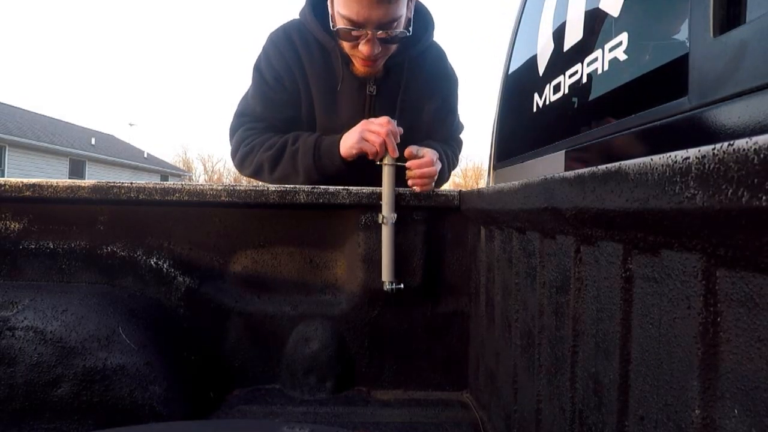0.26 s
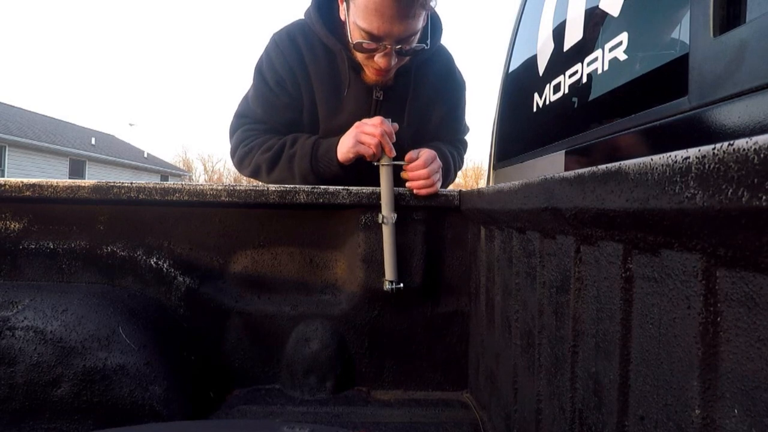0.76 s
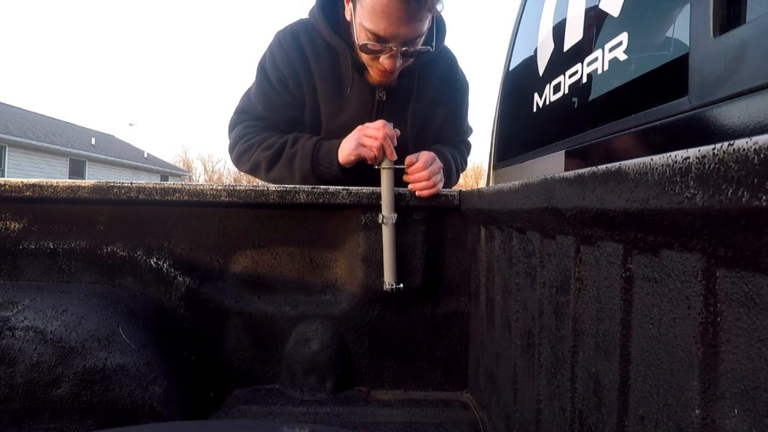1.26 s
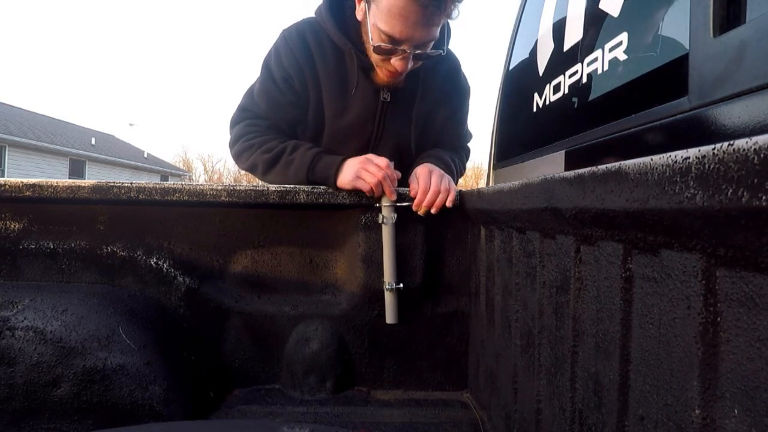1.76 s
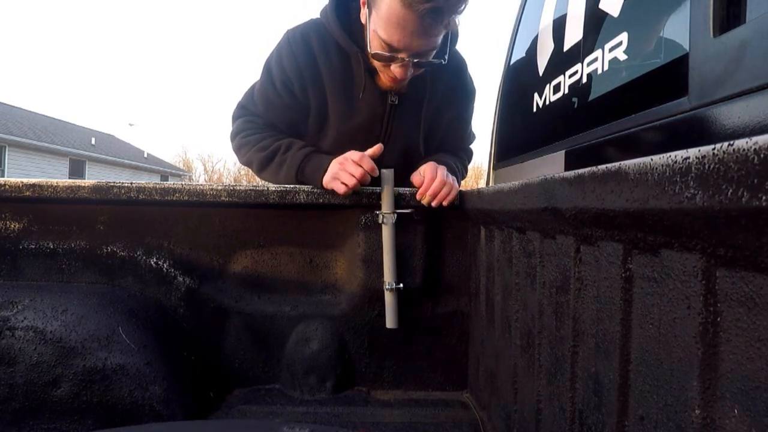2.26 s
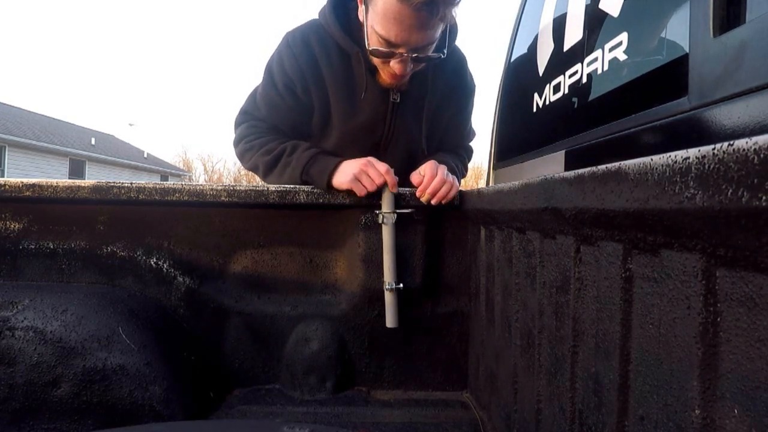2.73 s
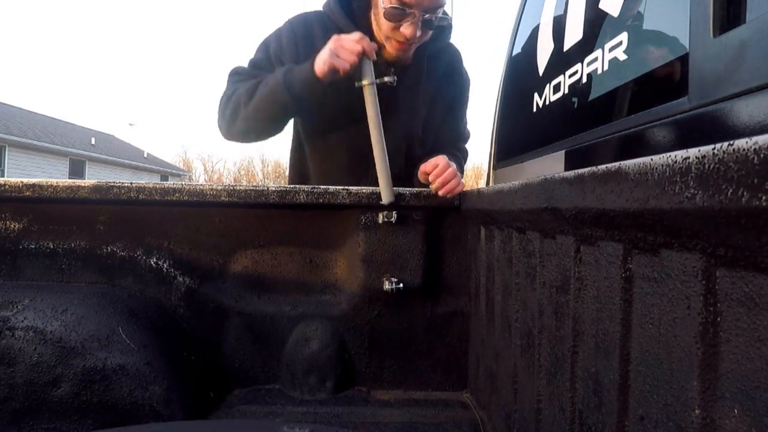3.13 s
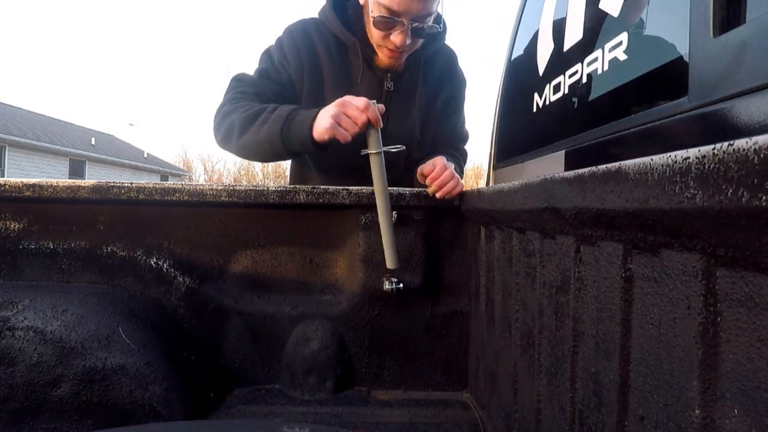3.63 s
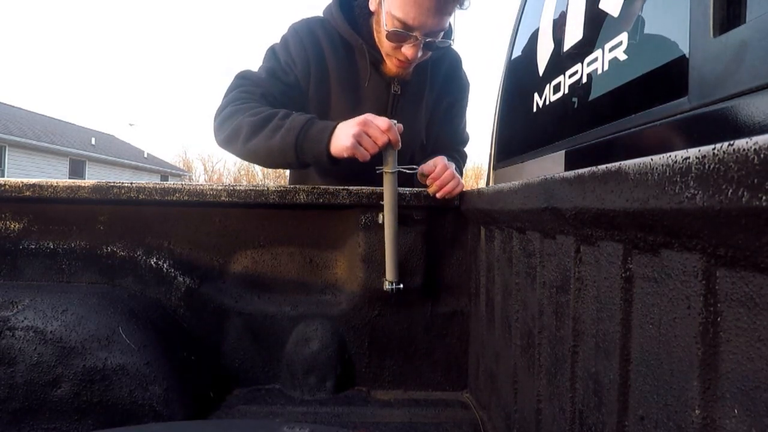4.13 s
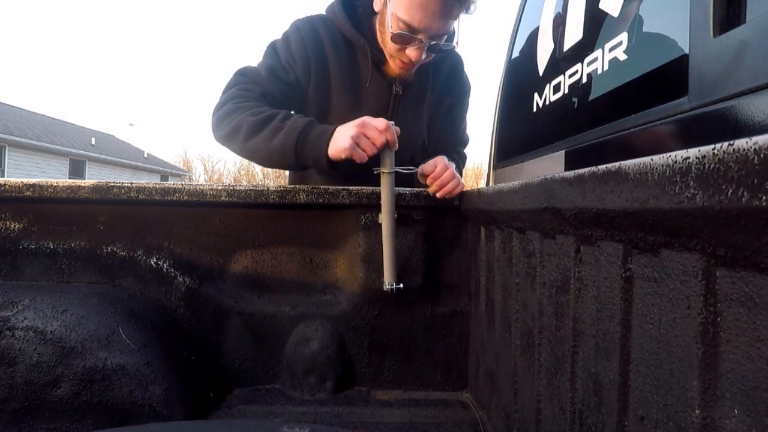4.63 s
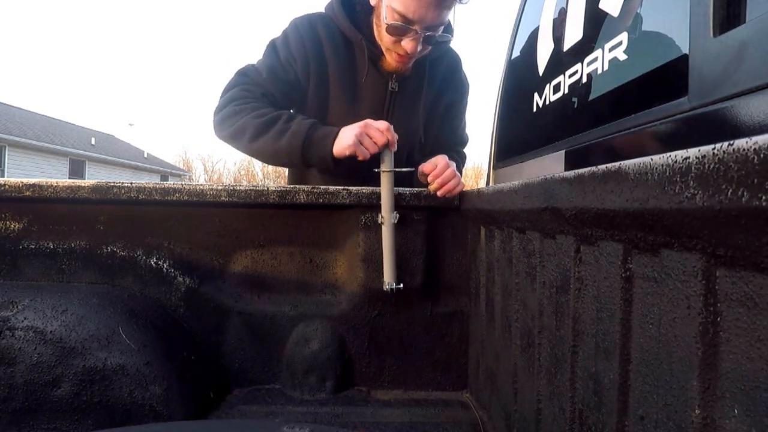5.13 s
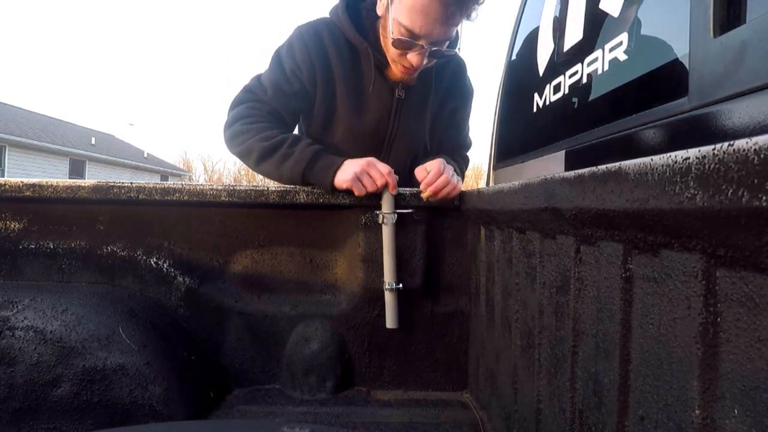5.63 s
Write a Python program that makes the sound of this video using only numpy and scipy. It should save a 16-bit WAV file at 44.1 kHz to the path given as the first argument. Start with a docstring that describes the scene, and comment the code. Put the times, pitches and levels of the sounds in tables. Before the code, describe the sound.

Outdoors beside a pickup bed, close to the microphone, with low wind buffets that mostly calm later and a very faint distant hum. A plastic pipe rubs briefly, then strikes a metal clamp with a hard, bright double clack at 0.3 s. Faint ticks and short dry scrapes follow, with more rubbing from 1.5 s until a sharp, higher clack at 1.9 s. Near quiet holds until about 2.7 s. Then the pipe is pulled out: the strongest scrape, a short rising groan and a cluster of knocks, ending around 3.05 s in a faint hollow ring. Quiet again until light clicks at 3.85 s. From 4.2 s come irregular ticks and scrapes as it is worked back in. A brief squeaky groan leads to heavy hollow knocks at 5.25 s, then smaller knocks, scraping and a last bright clack at 5.7 s. The bed adds a brief rattle.

```python
"""Outdoors, at the bed of a pickup: a plastic pipe is pushed down through bent metal clamps on the bed's wall,
pulled out and pushed in again. It ticks against the clamps, scrapes through them and knocks home.
Blows and rubbing are short noises and clicks that set off the ring of pipe, clamps and wall, with a brief rattle
between the sides of the bed. Gliding tones make the groans, fading tones the ring of the freed pipe,
and filtered noise the wind on the microphone and a distant hum."""
import sys
import numpy as np
from scipy import signal
from scipy.fft import rfft, irfft, next_fast_len
from scipy.io import wavfile

SR = 44100
rng = np.random.default_rng(int(sys.argv[2]) if len(sys.argv) > 2 else 0)


def wav_out(sig):
    """Save sig, one row per channel (or a flat mono array), as 16-bit PCM at SR to the path in sys.argv[1]."""
    wavfile.write(sys.argv[1], SR, np.round(np.clip(np.atleast_2d(sig).T, -1, 1) * 32767).astype(np.int16))


N = 259308  # samples in the scene
RING = 32768  # samples in one ring
TIME = np.arange(N) / SR  # s
# a blow favours one of four notes of the pipe, by where it lands; the clamp strap answers near its own note
LOW_HZ, MID_HZ, SEATED_HZ, HIGH_HZ, STRAP_HZ = 777.5, 926, 1020, 1525, 2168

# edges of the boom, thump, knock, clack and tick ranges: low [Hz], high [Hz]
RANGES_HZ = [(90, 260), (260, 700), (700, 2000), (2000, 6000), (6000, 15000)]


def undb(db):
    """Turn decibels into gain."""
    return 10 ** (np.asarray(db) / 20)


def unit(x):
    """Scale to an average (rms) strength of 1."""
    return x / np.sqrt(np.mean(x ** 2))


def along(points, size):
    """Read (Hz, value) points at every bin of a spectrum, on a log-frequency axis."""
    hz, value = np.transpose(points)
    bin_hz = np.arange(size // 2 + 1) * SR / size
    return np.interp(np.log(np.maximum(bin_hz, 1)), np.log(hz), value)


def tint(x, *curves):
    """Colour a sound with curves of (Hz, dB) points, which add up; nothing sounds ahead of its cause."""
    size = next_fast_len(len(x) // 2 + 1024) * 2
    total_db = sum(along(points, size) for points in curves)
    # folding the cepstrum makes the filter minimum-phase, so it acts only forward in time
    cepstrum = irfft(np.log(undb(total_db)), size)
    cepstrum[1:size // 2] *= 2
    cepstrum[size // 2 + 1:] = 0
    return irfft(rfft(x, size) * np.exp(rfft(cepstrum)), size)[:len(x)]


def outdoors():
    """Wind is very low noise in slow buffets; the distant hum is noise whose level wavers."""
    # strength of the wind, gusty at first and then calm: start_s [s], level_db [dB, ahead of the gain below]
    gusts = [(0.0, -38), (0.05, -35.5), (0.65, -46.5), (0.74, -47.5), (1.28, -29.5), (1.31, -41.5),
             (1.41, -33), (1.77, -35.5), (1.85, -38.5), (2.15, -39), (2.21, -54.5), (2.6, -38),
             (3.19, -54.5), (5.21, -60), (5.31, -42), (5.88, -57)]
    # colour of the wind: pitch_hz [Hz], level_db [dB]
    wind_colour = [(2, -3.5), (8, 20.5), (20, -4), (35, -3.5), (60, -23), (120, -38.5), (300, -90.5)]
    # colour of the distant outdoor hum: pitch_hz [Hz], level_db [dB]
    hum_colour = [(24, -37.5), (40, -3.5), (75, 10), (101, -4), (139, 2), (162, -9), (317, -15.5),
                  (591, -20.5), (740, -24.5), (797, -25.5), (1130, -28.5), (1250, -30), (15500, -47)]
    wind_gain_db, hum_db, waver_db = 8, -59.3, 0.7

    wind_level_db = wind_gain_db + np.interp(TIME, *np.transpose(gusts))
    wind = unit(tint(rng.standard_normal(N), wind_colour)) * undb(wind_level_db)
    waver = np.interp(TIME, np.linspace(0, TIME[-1], 30), rng.standard_normal(30))
    hum = unit(tint(rng.standard_normal(N), hum_colour)) * undb(hum_db + waver_db * waver)
    return wind + hum


def fade(t60):
    """Die away evenly in dB over one ring, by 60 dB in t60 seconds."""
    return np.exp(-np.log(1000) * np.arange(RING) / SR / np.maximum(t60, 1e-4))


def tone(hz, t60):
    """One struck mode: a single pitch that dies away."""
    return np.sin(2 * np.pi * hz * np.arange(RING) / SR) * fade(t60)


def rattles(count):
    """Dense reflections between the sides of the bed are fading noise; the treble dies first."""
    # how long the reflections last: pitch_hz [Hz], t60_s [s to fall by 60 dB]
    bed_t60 = [(100, 1), (260, 0.6), (700, 0.28), (1840, 0.23), (4850, 0.14), (12800, 0.12)]
    spectra = rfft(rng.standard_normal((count, RING)))
    centres = np.geomspace(80, 14000, 9)  # Hz
    hz, t60 = np.transpose(bed_t60)
    out = 0
    for centre, share in zip(centres, np.eye(len(centres))):
        band = irfft(spectra * along(np.c_[centres, share], RING))
        out = out + band * fade(np.interp(np.log(centre), np.log(hz), t60))
    return out


def responses(count):
    """Answers to a touch at several places: a bright crack, ringing modes and partly alike reflections."""
    # ring of wall, pipe and clamps: pitch_hz [Hz], level_db [dB, before random scatter], t60_s [s]
    modes = [(122.4, -21.5, 0.66), (148, -24, 0.22), (180.3, -26.5, 0.63), (204.1, -18.5, 0.42),
             (282, -28, 0.65), (348.4, -27, 0.66), (385, -29, 0.66), (647.1, -23.5, 0.35),
             (788, -20.5, 0.11), (802, -27.5, .35), (942, -22.5, 0.35), (972, -30, 0.069),
             (1292, -17, 0.12), (1501, -27.5, 0.033), (1690, -31.5, 0.077), (1940, -32, 0.26),
             (2075, -24, 0.15), (2300, -14, 0.068), (3380, -17.5, 0.065), (5970, -19, 0.06),
             (7620, -15, .17), (7600, -10.5, 0.13), (10620, -21.5, 0.026), (11280, -2.5, 0.083)]
    crack_db, crack_t60_s, crack_hz = 9, 0.07, 6000
    rattle_db, scatter_db, build_s = -1, 3, 0.0017
    alike = 0.59  # share of the reflections' power that all places have in common

    common, *own = rattles(count + 1)
    bed = np.sqrt(alike) * common + np.sqrt(1 - alike) * np.array(own)

    rings = np.array([undb(db) * tone(hz, t60) for hz, db, t60 in modes])
    shape = (count, len(modes))
    weights = undb(scatter_db * rng.standard_normal(shape)) * rng.choice([-1, 1], shape)

    # the metal strap cracks at once; plastic and wall take a few milliseconds to get going
    highpass = signal.butter(2, crack_hz, "high", fs=SR, output="sos")
    crack = signal.sosfilt(highpass, rng.standard_normal((count, RING)) * fade(crack_t60_s))
    swell = 1 - np.exp(-np.arange(RING) / SR / build_s)
    return undb(crack_db) * crack + swell * (undb(rattle_db) * bed + weights @ rings)


def formants(scatter_db):
    """Broad resonances as (Hz, dB) points; each point of contact favours different ones."""
    # pipe wall and clamp straps: pitch_hz [Hz], width_hz [Hz], level_db [dB, before random scatter]
    resonances = [(920, 110, -1), (1590, 370, 6), (2370, 1000, 3.5), (3400, 910, 1.5), (4410, 630, 4),
                  (4960, 350, 2), (5803, 110, 11), (6300, 170, 1.5), (8300, 1100, 4), (8700, 220, 7),
                  (9400, 180, 14), (10445, 750, 14.5), (11490, 1300, 8.5), (12950, 2100, 4.5),
                  (14900, 1300, 8.5)]
    grid = np.arange(20, 17000, 40)  # Hz
    hz, width, db = np.transpose(resonances)
    bumps = 0.5 ** (2 * (grid[:, None] - hz) / width) ** 2
    return np.c_[grid, bumps @ (db + scatter_db * rng.standard_normal(len(db)))]


def slips(rate, size_db):
    """Sticking and slipping gives clicks at random moments, many small and a few large."""
    size = undb(size_db * np.minimum(rng.exponential(size=N), 4))
    clicks = rng.random(N) < rate / SR  # rate is clicks per second
    return unit(clicks * size * rng.choice([-1, 1], N))


def moving_contact(push, count):
    """The contact jumps from place to place along the pipe; each rings in its own way, damped by the grip."""
    dwell_s, grip_t60_s = 0.045, 1.0
    place = (TIME / dwell_s).astype(int) % count
    out = np.zeros(N)
    for k, ring in enumerate(responses(count)):
        ring = tint(ring * fade(grip_t60_s), formants(scatter_db=4.5))
        out += signal.oaconvolve(push * (place == k), ring / np.linalg.norm(ring))[:N]
    return out


def scrapes():
    """The pipe speeds up, slides in tiny slips and brakes; the clamp's edge adds hiss as the speed grows."""
    # slides: start_s [s], speeding_up_s [s], full_speed_s [s],
    # rub_db and hiss_db [dB at full speed, ahead of filters and grip]
    slides = [(0.0, 0.05, .05, -49.5, -86), (0.11, 0.092, 0.089, -37, -71), (0.70, 0.023, 0.034, -42, -75),
              (1.06, 0.034, 0.046, -43.5, -66.5), (1.21, .04, 0.019, -50.5, -93),
              (1.349, 0.054, 0.05, -46, -88.5), (1.519, 0.06, 0.022, -39.5, -67),
              (1.60, 0.033, 0.028, -38.5, -66), (1.722, 0.12, 0.042, -37, -61),
              (2.81, 0.086, 0.045, -30.5, -64), (2.928, 0.14, 0.032, -26.5, -55.5),
              (4.18, 0.077, 0.087, -34.5, -60), (4.55, 0.024, 0.047, -42.5, -83),
              (4.64, 0.11, 0.025, -55, -97), (5.08, .14, 0.013, -37.5, -68),
              (5.422, 0.086, 0.0044, -33, -67), (5.59, 0.037, 0.046, -38.5, -64.5),
              (5.759, 0.06, 0.092, -55, -85)]
    # colour of the sliding: pitch_hz [Hz], level_db [dB]
    rub_colour = [(40, -11.5), (120, -7.5), (200, 8), (400, 11), (900, 13), (2000, -2), (2400, 1),
                  (3500, -4), (5500, -11), (6700, -12), (8300, -2.5), (11300, -7), (12500, -4),
                  (14500, -10)]
    braking_share = 0.45  # braking time over speeding-up time
    rub_power, hiss_power = 1.01, 1.6  # how steeply each grows with speed
    grip_db, grip_rate_hz, split_hz = 2, 45, 5200

    rub, hiss = np.zeros((2, N))
    for start, rise, hold, rub_db, hiss_db in slides:
        corners = start + np.cumsum([0, rise, hold, braking_share * rise])
        speed = np.interp(TIME, corners, [0, 1, 1, 0])
        rub += undb(rub_db) * speed ** rub_power
        hiss += undb(hiss_db) * speed ** hiss_power

    uneven = np.interp(TIME * grip_rate_hz, np.arange(N), rng.standard_normal(N))
    grip = undb(grip_db * uneven)
    lowpass = signal.butter(4, split_hz, fs=SR, output="sos")
    highpass = signal.butter(4, split_hz, "high", fs=SR, output="sos")
    dull = signal.sosfilt(lowpass, slips(rate=520, size_db=3.0) * rub)
    sharp = signal.sosfilt(highpass, slips(rate=8700, size_db=6.0) * hiss)
    return tint(moving_contact((dull + sharp) * grip, count=11), rub_colour)


def chatter(ring, looseness, count):
    """A loose pipe rebounds a few times; one driven hard against the clamp is damped by it."""
    gap_s, bounce_db, seated_t60_s = 0.006, -4, 0.23
    out = ring.copy()
    lags = (np.cumsum(rng.uniform(0.5, 2, count)) * gap_s * SR).astype(int)
    for k, lag in enumerate(lags):
        bounce = looseness * undb(bounce_db * (k + 2.5)) * rng.choice([-1, 1])
        out[lag:] += bounce * ring[:RING - lag]
    held = (1 - looseness) * fade(seated_t60_s) + looseness
    return out * held * np.linalg.norm(ring) / np.linalg.norm(out)


def blow(ring, force_db, note, high_note):
    """One contact: it rebounds most if light, and favours two notes and the modes next to them."""
    note_db, note_t60_s = -14, 0.059
    high_note_db, high_note_t60_s = -16, 0.11
    lift_db, lift_octaves = 4, 0.04
    loose_db, seated_db = -42, -25  # forces between which the rebounds weaken

    looseness = np.interp(force_db, [loose_db, seated_db], [1, 0.35])
    low_tone = undb(note_db) * tone(note, note_t60_s)
    high_tone = undb(high_note_db) * tone(high_note, high_note_t60_s)
    step = 2 ** lift_octaves
    lifts = [[(hz / step, 0), (hz, lift_db), (hz * step, 0)] for hz in (note, high_note)]
    struck = chatter(ring, looseness, count=3) + low_tone + high_tone
    return tint(struck, formants(scatter_db=3.5), *lifts)


def range_db(x):
    """Energy of a ring in each of the five ranges, in dB."""
    power = np.abs(rfft(x)) ** 2
    hz = np.arange(RING // 2 + 1) * SR / RING
    return np.array([10 * np.log10(power[(hz >= low) & (hz < high)].sum()) for low, high in RANGES_HZ])


def balance(force, hardness, weight, note_hz):
    """Strength of the five ranges in dB: weight shakes the wall, hardness makes the clamp tick."""
    # higher notes ring more in the pipe, less in the strap: 3 dB an octave
    pipe_db = 3 * np.log2(note_hz / MID_HZ)
    boom = -3 + 0.75 * weight
    thump = -2.54 + 1.0 * weight + 0.32 * hardness
    knock = 0.35 + pipe_db
    clack = 0.5 - pipe_db + 0.18 * hardness
    tick = -13 + hardness
    return force + np.array([boom, thump, knock, clack, tick])


def wall(x):
    """The heavy wall takes some milliseconds to answer, so its boom near 185 Hz comes late."""
    # taking away twice the peak makes an all-pass: a delay around that pitch, no change of level
    return x - 2 * signal.lfilter(*signal.iirpeak(185, 2.4, fs=SR), x)


def knocks():
    """Every blow rings pipe, strap and wall, its notes a little shifted by the grip."""
    # pipe meets clamp: start_s [s], force_db [dB], hardness_db [dB, treble over force],
    # weight_db [dB, shaking of the wall over force], note_hz [Hz, before random detuning]
    hits = [ (0.0014, -47.5, -13, 21, LOW_HZ), (0.1004, -63.5, -19, 18, LOW_HZ),
            (0.3065, -27, 6.5, 3.5, LOW_HZ), (0.3249, -31, 3.5, -3.5, MID_HZ),
            (0.403, -50.5, -13.5, 12, MID_HZ), (0.425, -60.5, -19, 17.5, LOW_HZ),
            (0.6254, -68.5, -11, 14, LOW_HZ), (0.7032, -56, -21, 11, LOW_HZ),
            (0.7264, -48.5, -11, 2, LOW_HZ), (0.7839, -46, -18, -4, LOW_HZ), (0.8783, -56, 0, 6, LOW_HZ),
            (1.044, -54.5, -27, 6, MID_HZ), (1.065, -40.5, -17.5, -4.5, MID_HZ),
            (1.124, -44.5, -19, 2.5, MID_HZ), (1.1912, -53, -12, 5.5, LOW_HZ),
            (1.2303, -52.5, -8.5, 3.5, LOW_HZ), (1.5387, -60.5, -10, 19, MID_HZ),
            (1.5593, -59.5, 6, 0, LOW_HZ), (1.6503, -62, 9.5, 7, LOW_HZ), (1.873, -27.5, 2.5, -4, HIGH_HZ),
            (1.8854, -35, -8, 3.5, LOW_HZ), (2.572, -71.5, -9, 16.5, LOW_HZ),
            (2.6966, -49, -18.5, -27, HIGH_HZ), (2.7949, -53.5, -44, 9, MID_HZ),
            (2.837, -48, -3, 2.5, LOW_HZ), (2.8712, -45, -8, -6, MID_HZ), (2.9327, -46, 2, 9, MID_HZ),
            (2.9785, -40, 9, -1, LOW_HZ), (3.013, -34, -10, -4, HIGH_HZ), (3.0491, -34, -32.5, 4, LOW_HZ),
            (3.8461, -42, -7, 2, LOW_HZ), (3.8528, -47, 10.5, -4, HIGH_HZ),
            (3.8885, -49.5, -2, 5.5, MID_HZ), (4.0288, -58, -20, -2, MID_HZ),
            (4.1823, -52, 5.5, 6.5, LOW_HZ), (4.1944, -46, 2, 3, MID_HZ), (4.2394, -39, -0.5, 0, HIGH_HZ),
            (4.2612, -39, 3, -1, MID_HZ), (4.316, -35.5, -3, -10, LOW_HZ), (4.4879, -54, 2, 10.5, LOW_HZ),
            (4.529, -49, 0, 7, HIGH_HZ), (4.5556, -46.5, -26, 4, MID_HZ), (4.568, -57, 6.5, 0, MID_HZ),
            (4.6297, -58.5, 1, 9, MID_HZ), (4.8339, -59, -7, 1.5, LOW_HZ), (4.908, -41, 2, -2, LOW_HZ),
            (5.012, -40.5, -28, -8, HIGH_HZ), (5.237, -35.5, 0.5, 1, SEATED_HZ),
            (5.2438, -25, -6, -4.5, SEATED_HZ), (5.261, -26, -11.5, -5, MID_HZ),
            (5.3489, -34, -14, -2.5, SEATED_HZ), (5.3707, -44, -1, -3, MID_HZ), (5.5384, -48, 5, 0, MID_HZ),
            (5.621, -46.5, -25, 1, MID_HZ), (5.684, -30, 2, -6, HIGH_HZ), ]
    # colour common to all blows: pitch_hz [Hz], level_db [dB]
    hit_colour = [(30, -20), (90, -10.5), (190, 0), (400, 1), (900, -0.5), (1900, -9.5), (3300, -6),
                  (5600, -8.5), (6700, -11), (8300, -6.5), (11300, -14.5), (12300, -15.5), (14500, -25),
                  (16000, -20.5)]
    note_spread, strap_spread = 0.022, 0.076  # random detuning, as a share of the pitch

    detune = np.exp(rng.standard_normal((len(hits), 2)) * [note_spread, strap_spread])
    blows = []
    for (_, force, _, _, note), (pipe, strap), ring in zip(hits, detune, responses(len(hits))):
        blows.append(blow(ring, force, note * pipe, STRAP_HZ * strap))

    energy_db = np.array([range_db(x) for x in blows])
    spread_db = energy_db - energy_db.mean(axis=0)
    low, high = np.transpose(RANGES_HZ)
    centre_hz = np.sqrt(low * high)
    width_db = 10 * np.log10((high - low) / (SR / 2))
    out = np.zeros(N + RING)
    # the force of a blow sets its strength in each range, however its modes happen to add up
    for (s, *contact), x, own_db in zip(hits, blows, spread_db):
        start = max(int(s * SR), 0)
        level_db = balance(*contact) - width_db - own_db
        out[start:start + RING] += tint(x, np.c_[centre_hz, level_db])
    return wall(tint(out[:N], hit_colour))


def groans():
    """Where the pipe binds, sticking and slipping fall into a rough pitch that rises as it speeds up."""
    # one table a groan: start_s [s], pitch_hz [Hz], level_db [dB, before flutter],
    # roughness [0-1, random wander as a share of the pitch]
    groan_tables = [
        [(2.785, 444, -76, 0.23), (2.805, 508, -49, 0.38), (2.845, 621, -38, 0), (2.89, 631, -54, 0.03),
         (2.92, 720, -40, 0.19), (2.96, 740, -59, 0)],
        [(5.12, 1100, -66, 0.32), (5.18, 1300, -48, 0.19), (5.235, 1390, -49, 0.12)],
    ]
    flutter, rate_hz = 0.28, 800
    steps = np.arange(0, N / SR, 1 / rate_hz)
    walks = rng.standard_normal((len(steps), 2)).T
    pitch_walk, size_walk = (np.interp(TIME, steps, walk) for walk in walks)
    out = np.zeros(N)
    for groan in groan_tables:
        s, hz, db, rough = np.transpose(groan)
        pitch = np.interp(TIME, s, hz) * (1 + np.interp(TIME, s, rough) * pitch_walk)
        phase = 2 * np.pi * np.cumsum(pitch) / SR
        # silent outside the table's times
        out += np.sin(phase) * undb(np.interp(TIME, s, db, left=-np.inf, right=-np.inf))
    return out * (1 + flutter * size_walk)


def withdrawal():
    """Pipe and loose clamp sing faintly as they come free; modes close in pitch beat."""
    # fading tones: start_s [s], pitch_hz [Hz], level_db [dB], t60_s [s]
    free_rings = [(3.06, 8500, -65, 0.39), (3.08, 807, -36, 0.34), (3.15, 3380, -80.5, 1),
                  (3.149, 3410, -73.5, 0.8), (3.15, 3410, -78, 1)]
    out = np.zeros(N)
    for s, hz, db, t60 in free_rings:
        start = int(s * SR)
        out[start:start + RING] += undb(db) * tone(hz, t60)
    return out


def scene():
    """Open air, scrapes, knocks, groans and free ringing add up at one microphone."""
    return (outdoors() + scrapes() + knocks() + groans() + withdrawal())[None]


def record(dry):
    """A steep low-pass filter cuts the top of the treble, above 15150 Hz."""
    lowpass = signal.ellip(10, 0.2, 80, 15150, fs=SR, output="sos")
    return signal.sosfilt(lowpass, dry)


dry = scene()
out = record(dry)
wav_out(out)
```